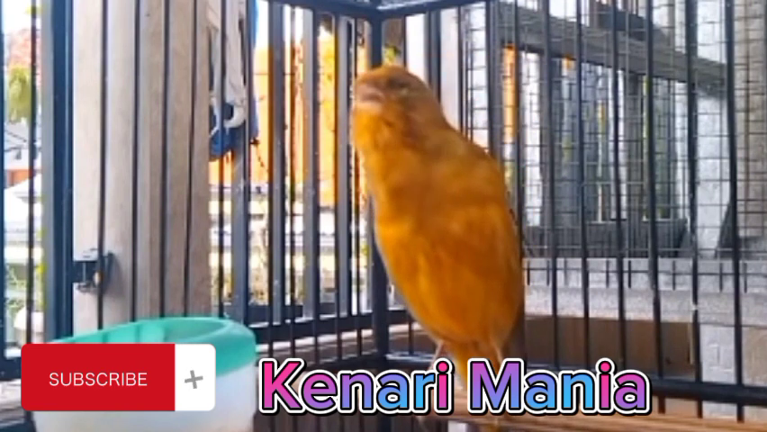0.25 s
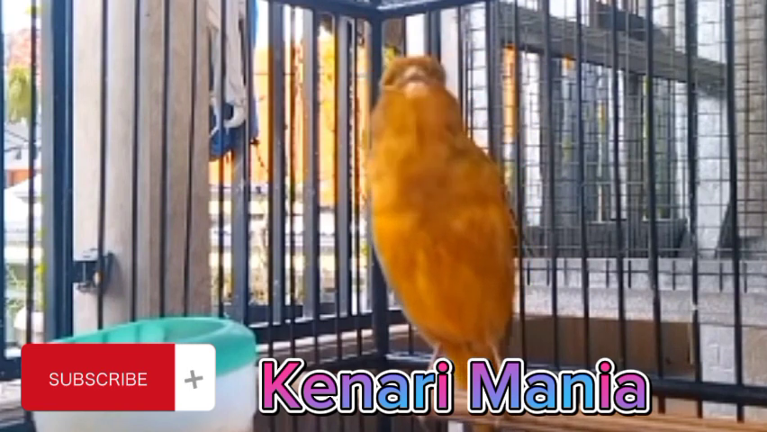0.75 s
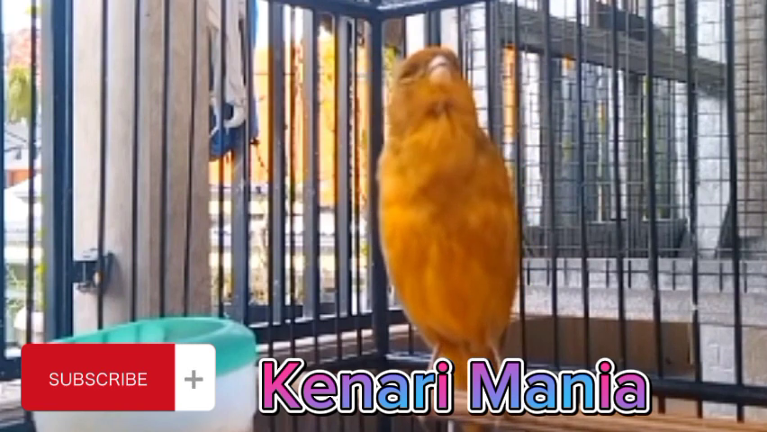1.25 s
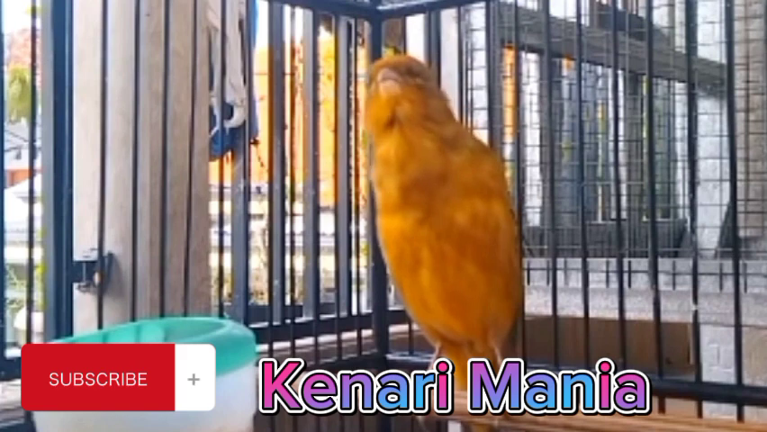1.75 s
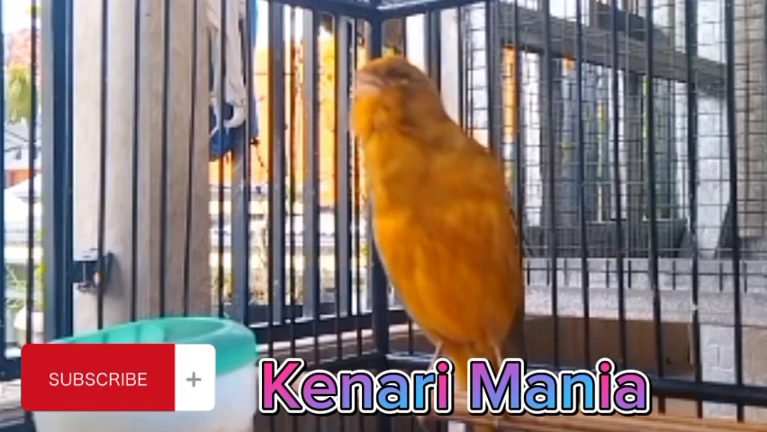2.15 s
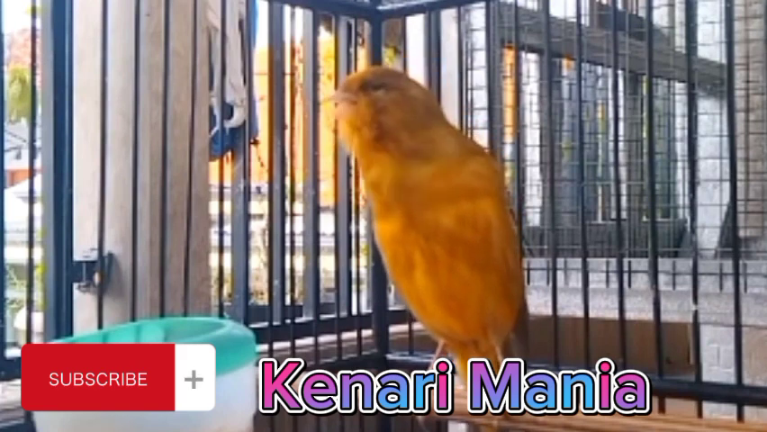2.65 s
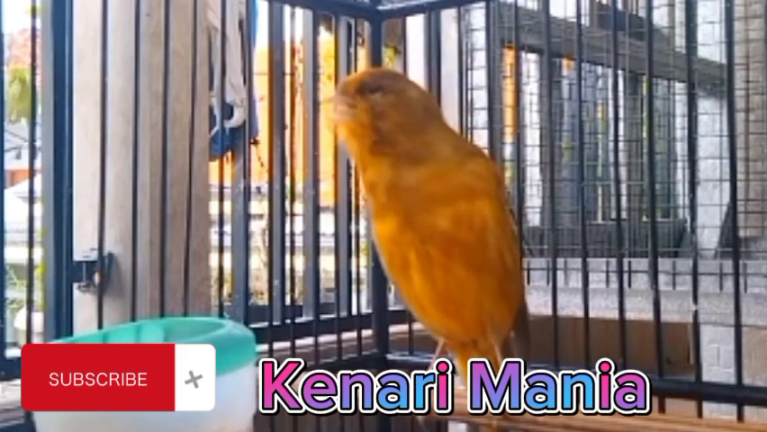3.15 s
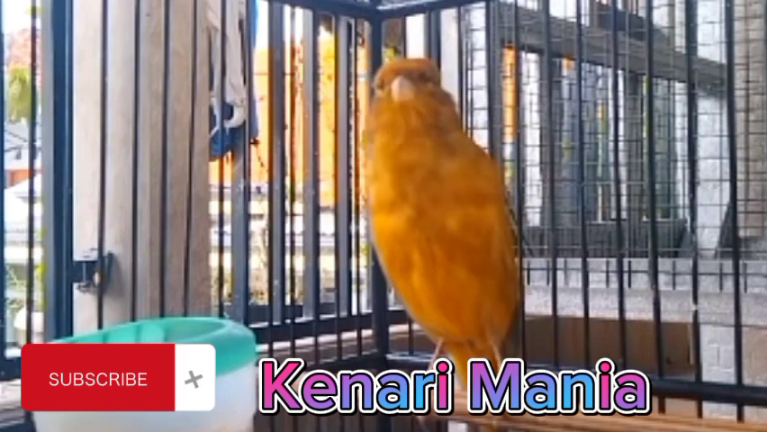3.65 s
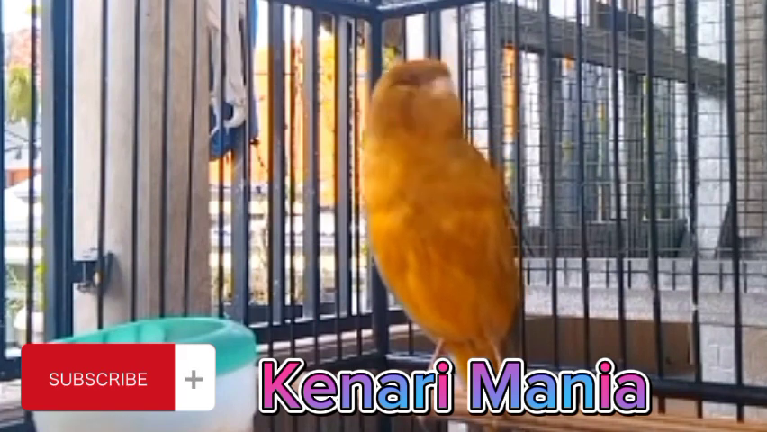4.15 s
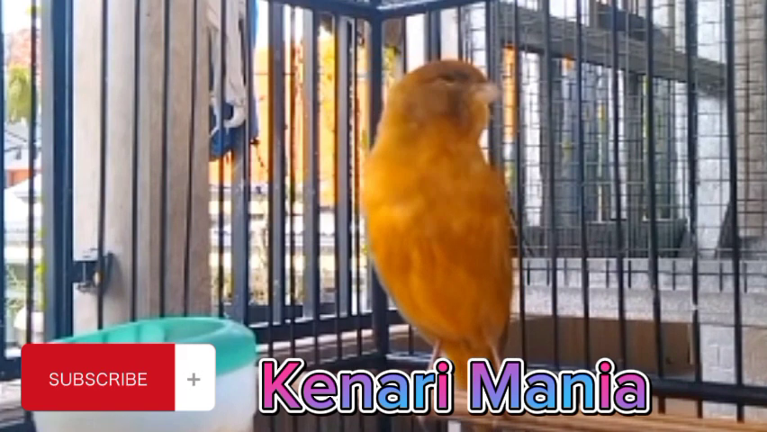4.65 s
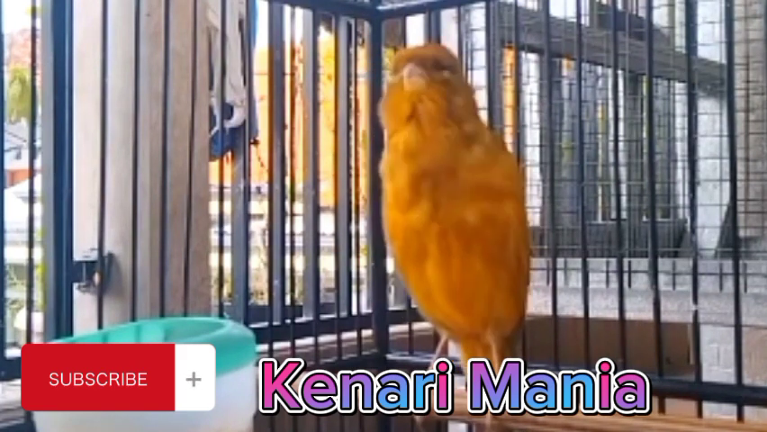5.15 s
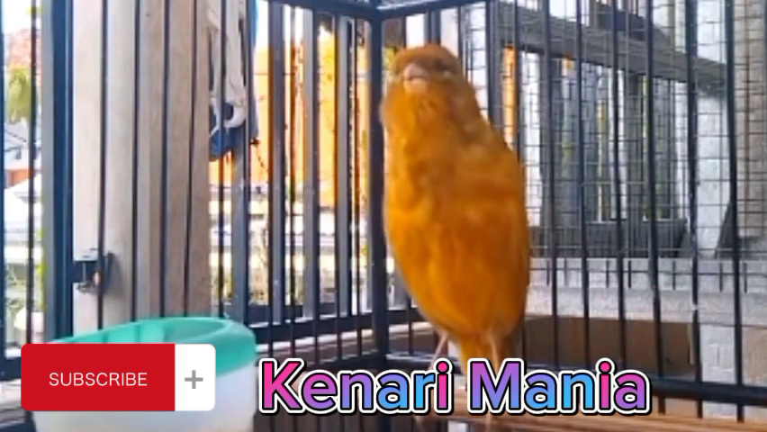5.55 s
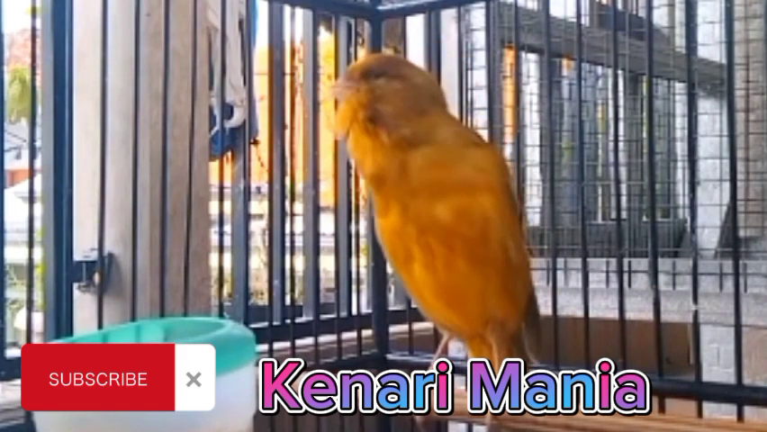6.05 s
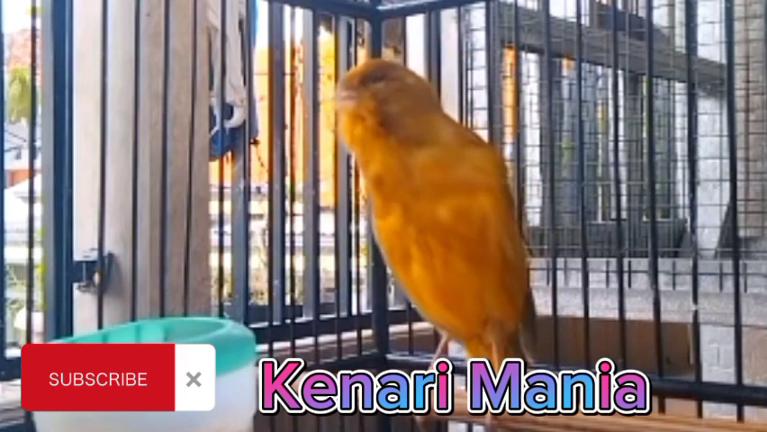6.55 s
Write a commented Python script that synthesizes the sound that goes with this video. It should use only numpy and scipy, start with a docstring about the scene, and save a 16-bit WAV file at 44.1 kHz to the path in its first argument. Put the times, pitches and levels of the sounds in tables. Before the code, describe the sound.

Over a faint hiss of distant traffic, a canary whistles loudly at close range, its notes ringing briefly off nearby walls. Downward swoops lead to rising notes, a rapid chirping trill and five falling whistles. The bird then rests while a soft low drone swells behind. After a brief dropout, the song returns with two tiny ticks and another series of high, falling whistles.

```python
"""A caged canary sings close by: falling and rising whistles, a fast trill, more falling whistles.
Each note is a gliding sine with weak overtones and a rasp of air in the beak; nearby walls answer it
with echoes and a diffuse tail. Distant street noise and a low, swelling drone lie behind.
The microphone flattens the loudest peaks. The sound drops out once for a moment and ticks twice
in the whistle after it."""
import sys
import numpy as np
from scipy import signal
from scipy.fft import rfft, irfft, next_fast_len
from scipy.io import wavfile
from scipy.ndimage import uniform_filter1d, map_coordinates

SR = 44100
rng = np.random.default_rng(int(sys.argv[2]) if len(sys.argv) > 2 else 0)


def bounce(signal):
    """Save signal as a 16-bit WAV file at the path given by the first command-line argument."""
    frames = np.transpose(np.atleast_2d(signal))
    limited = np.clip(frames, -1, 1)
    pcm = np.round(limited * 32767).astype(np.int16)
    wavfile.write(sys.argv[1], SR, pcm)


N = 300321
TIME = np.arange(N) / SR


def amp(db):
    """Gain of a level in dB."""
    return 10 ** (np.asarray(db) / 20)


def unit_rms(x):
    """x scaled to rms 1."""
    return x / np.sqrt(np.mean(x ** 2) + 1e-20)


def at_hz(points, hz):
    """(Hz, value) points interpolated on a log frequency axis."""
    knots_hz, values = np.transpose(points)
    return np.interp(np.log(hz + 1), np.log(knots_hz + 1), values)


def wobble(rate_hz, count=N):
    """Smooth random curve, rate_hz knots a second."""
    knots = rng.standard_normal(int(count * rate_hz / SR) + 4)
    return map_coordinates(knots, [np.arange(count) * rate_hz / SR])


def filtered(x, response):
    """x filtered by response, a gain as a function of Hz."""
    size = next_fast_len(N + SR // 2)
    return irfft(rfft(x, size) * response(np.fft.rfftfreq(size, 1 / SR)), size)[..., :N]


# Each row: frequency in Hz, relative spectral density in dB.
STREET_SPECTRUM = [(18, -45), (30, -11), (245, -8.5), (384, -7.5), (740, -2), (844, -1), (1010, -3),
                   (1720, -6), (1960, -9), (2680, -2), (3670, -7.5), (7270, -18), (9220, -33),
                   (14800, -46.5), (16000, -43)]
# Each row: time in seconds, level in dB.
STREET_ENVELOPE = [(0, -47), (2.2, -47), (4.5, -48.5), (5.4, -49), (6.81, -48)]


def street():
    """Far traffic and air: a broad hiss that wavers gently in colour and level."""
    spectra = signal.stft(rng.standard_normal(N), nperseg=512)[2]
    patches = uniform_filter1d(rng.standard_normal(spectra.shape), 8, axis=0)
    patches = uniform_filter1d(patches, 10, axis=1)
    noise = signal.istft(spectra * amp(1.4 * unit_rms(patches)), nperseg=512)[1][:N]
    hiss = unit_rms(filtered(noise, lambda hz: amp(at_hz(STREET_SPECTRUM, hz))))
    level_db = np.interp(TIME, *np.transpose(STREET_ENVELOPE)) + 0.32 * wobble(3.0) + 0.2 * wobble(14)
    return amp(level_db) * hiss


# Each row: centre in Hz, width in Hz, relative gain per pass in dB.
DRONE_RESONANCES = [(136, 61, -2.5), (215, 81, -3)]
# Each row: time in seconds, level in dB.
DRONE_ENVELOPE = [(3.4, -65), (3.95, -62), (4.15, -59.5), (4.35, -54), (4.43, -63), (4.54, -60), (4.6, -66),
                  (5.5, -71), (5.63, -56.5), (5.75, -61.5), (5.95, -68.5), (6.5, -69), (6.81, -61)]


def drone():
    """A low, swelling hum: noise passed twice through a pair of resonances."""
    def resonances(hz):
        return sum(amp(db) * 1j * hz * width / (centre ** 2 - hz ** 2 + 1j * hz * width)
                   for centre, width, db in DRONE_RESONANCES)

    hum = unit_rms(filtered(rng.standard_normal(N), lambda hz: resonances(hz) ** 2))
    return amp(np.interp(TIME, *np.transpose(DRONE_ENVELOPE), left=-120, right=-120)) * hum


# Each row: frequency in Hz, time to decay 60 dB in seconds.
TAIL_T60 = [(2000, 0.35), (3000, 0.39), (4000, 0.41), (5500, 0.32), (8000, 0.13), (13000, 0.35)]
# Each row: frequency in Hz, relative level in dB.
TAIL_COLOUR = [(2200, 5.5), (2700, 0.5), (3300, -6.5), (4000, 0), (5000, 0), (6500, -1.5), (9000, 4.5),
               (14000, 2.5)]
# Each row: delay in ms, gain in dB.
WALL_ECHOES = [(2.5, -9.5), (8.2, -11), (12.7, -9.5), (28, -19.5), (55, -19), (85, -32)]


def walls(tail_db, scatter):
    """Room impulse response: a diffuse tail, and echoes that bars and rough walls smear with distance."""
    hz, t, spectra = signal.stft(rng.standard_normal(SR // 2), SR, nperseg=256)
    decay_db = at_hz(TAIL_COLOUR, hz)[:, None] - 60 * t / at_hz(TAIL_T60, hz)[:, None]
    tail = signal.istft(spectra * amp(decay_db), SR, nperseg=256)[1]
    ms = np.arange(len(tail)) * 1000 / SR
    tail *= 1 - np.exp(-ms / 9)
    response = amp(tail_db) * tail / np.linalg.norm(tail)
    for delay_ms, db in WALL_ECHOES:
        burst = np.exp(-((ms - delay_ms) / (scatter * delay_ms)) ** 2) * rng.standard_normal(len(ms))
        response += amp(db) * burst / np.linalg.norm(burst)
    return response


# Each row: start in seconds, length in seconds, top in Hz, bottom in Hz, gain in dB.
SWOOP_NOTES = [(-.218, 0.15, 6670, 2735, 2), (0, 0.15, 6810, 2740, 0), (.219, 0.15, 6780, 2652, -0.5)]
# Each row: share of the length, share of the drop still to come.
SWOOP_GLIDE = [(0, 0.99), (.13, .94), (.38, .69), (.6, .47), (.69, .46), (.84, .27), (.92, .12), (1, 0.035)]
# Each row: pitch in Hz, level in dB.
SWOOP_LEVEL_BY_PITCH = [(2740, -12), (2950, -12), (3150, -11.5), (3420, -23), (3750, -5.5), (4300, -13.5),
                        (4550, -10.5), (4750, -23), (5050, -15), (5400, -23.5), (6000, -25.5), (6700, -44)]


def swoop(start_s, length_s, top_hz, bottom_hz, db):
    """Contour of a loud, steep drop that lingers where the voice changes register."""
    progress = np.linspace(0, 1, 80)
    hz = bottom_hz + (top_hz - bottom_hz) * np.interp(progress, *np.transpose(SWOOP_GLIDE))
    return np.transpose([start_s + progress * length_s, hz, db + at_hz(SWOOP_LEVEL_BY_PITCH, hz)])


# Each row: start, length and glide time in seconds, top and bottom in Hz, gain in dB,
# tilt in dB per octave, gain around HIGH_HZ in dB.
FALL_NOTES = [(2.481, 0.19, 0.18, 6930, 2546, 0.5, 3.2, -21), (2.704, 0.19, 0.19, 7220, 2540, 0.8, 0, 1.5),
              (2.934, 0.2, 0.19, 7160, 2551, 2, -4, 3.5), (3.171, 0.23, 0.2, 7010, 2477, 0, 1.8, -2),
              (3.44, 0.19, 0.2, 7150, 2495, 0, 0.3, 1), (5.51, 0.19, 0.2, 6730, 2673, 0.5, 3, -5),
              (5.733, 0.2, 0.19, 7010, 2680, 1.4, 0.2, -3.5), (5.965, 0.2, 0.18, 6940, 2647, -0.4, 3.7, 1),
              (6.182, .2, 0.2, 7010, 2614, -1, -1, -0.5), (6.437, .24, 0.21, 6920, 2533, -1.5, -0.3, 5),
              (6.725, .2, .21, 7020, 2490, -1, 1.5, 4.5)]
# Each row: pitch in Hz, level in dB before the bird turns, level in dB after.
FALL_LEVEL_BY_PITCH = [(2579, -21, -21.5), (2665, -26, -30), (2750, -23, -23), (3060, -20, -18.5),
                       (3320, -18.5, -23), (3640, -26, -21), (3990, -23.5, -25), (4290, -31, -29.5),
                       (4770, -33, -27.5), (5230, -38, -33.5), (5820, -28.5, -32), (6980, -43, -50)]
TURN_S = 4.5
REGISTER_HZ, REGISTER_WIDTH_HZ, REGISTER_PULL = 4700, 450, 0.33
HIGH_HZ, HIGH_WIDTH_HZ = 6050, 480
RELEASE_S, RELEASE_DB = 0.017, 8
FLUTTER_DB, FLUTTER_HZ = 1.75, 110.1


def fall(start_s, length_s, glide_s, top_hz, bottom_hz, db, tilt_db, high_db):
    """Contour of a slow, fluttering fall: a near parabola that lingers at the register change."""
    t = np.linspace(0, length_s, 80)
    hz = bottom_hz + (top_hz - bottom_hz) * np.clip(1 - t / glide_s, 0, 1) ** 2.04
    hz -= REGISTER_PULL * (hz - REGISTER_HZ) * np.exp(-((hz - REGISTER_HZ) / REGISTER_WIDTH_HZ) ** 2)
    pitch_hz, before_db, after_db = np.transpose(FALL_LEVEL_BY_PITCH)
    level_db = db + at_hz(np.transpose([pitch_hz, before_db if start_s < TURN_S else after_db]), hz)
    level_db += tilt_db * np.log2(hz / 3500)
    level_db += high_db * np.exp(-((hz - HIGH_HZ) / HIGH_WIDTH_HZ) ** 2)
    level_db -= RELEASE_DB * np.clip(1 - (length_s - t) / RELEASE_S, 0, 1)
    level_db += FLUTTER_DB * map_coordinates(rng.standard_normal(64), [t * FLUTTER_HZ])
    return np.transpose([start_s + t, hz, level_db])


# Each row: start and length in seconds, level, accent and swell in dB, swell length in seconds.
RISE_NOTES = [(.64, 0.15, -20, 12, 2.5, 0.026), (.812, .146, -19.5, 11.5, 5.5, 0.024),
              (0.984, .149, -19.5, 10.5, 5.5, 0.037), (1.16, 0.05, -17, 6, -4.5, 0.0084)]
# Each row: time into the note in seconds, pitch in Hz.
RISE_GLIDE = [(0, 2420), (.005, 2847), (.009, 3180), (.013, 3318), (.019, 3530), (.037, 4230), (.055, 4570),
              (.074, 4785), (.11, 4956), (.148, 5062)]
ATTACK_S, ATTACK_DB, SAG_DB = 0.0063, 23, 4
ACCENT_AT_S, ACCENT_WIDTH_S = 0.012, 0.0035


def rise(start_s, length_s, db, accent_db, swell_db, swell_s):
    """Contour of a rising whistle: quick attack, accent, slow sag, closing swell."""
    t = np.linspace(0, length_s, 120)
    attack_db = ATTACK_DB * np.clip(1 - t / ATTACK_S, 0, 1)
    accent = np.exp(-((t - ACCENT_AT_S) / ACCENT_WIDTH_S) ** 4)
    swell = np.clip((t - length_s + swell_s) / 0.004, 0, 1)
    level_db = db - attack_db + accent_db * accent - SAG_DB * t / length_s + swell_db * swell
    return np.transpose([start_s + t, np.interp(t, *np.transpose(RISE_GLIDE)), level_db])


# Each row: start in seconds, level in dB.
FLICK_NOTES = [(2.476, -40), (2.7, -29), (2.93, -38.5), (3.167, -40)]


def flick(start_s, db, length_s=0.004, from_hz=5100, to_hz=7040, fade_db=1.5):
    """Contour of the upward flick that leads into a fall."""
    return [(start_s, from_hz, db), (start_s + length_s, to_hz, db - fade_db)]


# Each row: time in seconds, base level in dB, base pitch in Hz.
TRILL_NOTES = [(1.2569, -5.5, 3943), (1.314, -4, 3885), (1.3694, -4.5, 3907), (1.4278, -3, 3890),
               (1.4838, -3, 3896), (1.542, -3.5, 3840), (1.5996, -3.5, 3864), (1.6582, -4, 3850),
               (1.716, -3.5, 3858), (1.775, -3.5, 3843), (1.8344, -4.5, 3813), (1.894, -4, 3823),
               (1.954, -6, 3830), (2.0138, -5, 3850), (2.0742, -3.5, 3850), (2.134, -6, 3865),
               (2.1946, -7, 3765), (2.2598, -9, 3880)]
# Each row: time offset in seconds, ratio to base pitch, level offset in dB.
CHIRP_SHAPE = [(-.022, 0.51, -43), (-.015, 0.72, -24.5), (-.008, .84, -20), (-.002, .93, -12.5),
               (.002, 0.9675, -2), (.005, 1.04, -3.5), (.008, 1.091, -13.5), (0.012, 1.055, -11.5)]


def trill():
    """Contours of a fast run of upward chirps, all of one shape."""
    return [[(s + lag_s, hz * ratio, db + offset_db) for lag_s, ratio, offset_db in CHIRP_SHAPE]
            for s, db, hz in TRILL_NOTES]


# Where the beak points. Each row: time in seconds, overtone gain in dB, room gain in dB.
BEAK_AIM = [(0, 0.5, -1.5), (.5, -0.5, -1), (.65, 1.5, -0.5), (1.15, -1.5, -1.5), (1.3, -3.5, -2.5),
            (2.25, -5, 0), (2.4, -1.5, -1.5), (2.6, -5, -0.1), (3.7, -5, -0.6), (5.4, -6, -2),
            (6.1, -5.5, -0.5), (6.81, -7, -0.8)]
# Each row: harmonic number, base level in dB relative to the fundamental, flutter rate in Hz.
HARMONICS = [(2, -44.5, 60), (3, -37.5, 120), (4, -55, 78), (5, -55.5, 90)]
# Each row: frequency in Hz, gain in dB.
HARMONIC_COLOUR = [(5000, 0), (7000, 4), (8300, -1), (9500, -5.5), (10500, -5.5), (11500, -8), (13000, 4),
                   (15000, 3.5)]
RASP_LOW_HZ, RASP_HIGH_HZ = 10900, 16000


def whistle(contour, edge_s=0.0023, quiver=0.0025, rough_rad=1.0, flutter_db=5.5, rasp_db=-49.5):
    """First sample and sound of a note: a gliding sine whose overtones and air rasp grow with effort."""
    s, hz, db = np.transpose(contour)
    first = int(s[0] * SR)
    t = np.arange(first, int((s[-1] + edge_s) * SR)) / SR
    pitch_hz = uniform_filter1d(np.interp(t, s, hz), size=SR // 300, mode="nearest")
    phase = 2 * np.pi * np.cumsum(pitch_hz * (1 + quiver * wobble(250, len(t)))) / SR
    level_db = np.interp(t, s, db)
    beak_db = np.interp(t, *np.transpose(BEAK_AIM)[:2])
    effort_db = 0.39 * (level_db + 19.5)
    bright_db = beak_db + effort_db
    tone = np.sin(phase)
    for k, base_db, flutter_hz in HARMONICS:
        harmonic_hz = k * pitch_hz
        colour_db = at_hz(HARMONIC_COLOUR, harmonic_hz) + flutter_db * wobble(flutter_hz, len(t))
        colour_db += 1.4 * beak_db * np.clip(np.log2(harmonic_hz / 8500), 0, 1)  # highs beam most
        harmonic = np.sin(k * phase + rough_rad * wobble(400, len(t)))
        tone += (harmonic_hz < SR / 2) * amp(base_db + bright_db + colour_db) * harmonic
    rasp_band = signal.butter(4, (RASP_LOW_HZ, RASP_HIGH_HZ), "bandpass", fs=SR, output="sos")
    tone += amp(rasp_db + bright_db) * signal.sosfilt(rasp_band, rng.standard_normal(len(t)))
    soft_ends = np.clip(np.minimum(t - t[0], t[-1] - t) / edge_s, 0, 1)
    return first, np.sqrt(2) * amp(level_db) * soft_ends * tone


# One contour per note linking the phrases. Each row: time in seconds, pitch in Hz, level in dB.
LINK_CONTOURS = [
    [(.432, 6750, -48), (.448, 6420, -49), (.461, 6040, -31), (.472, 6020, -27), (.485, 5550, -29),
     (.498, 5170, -21.5), (.511, 4900, -28.5), (.525, 4690, -18), (.538, 4320, -29)],
    [(.555, 4600, -32), (.575, 4780, -27), (.593, 4840, -21.5), (.61, 4896, -24), (.632, 4900, -29)],
    [(2.296, 2420, -24), (2.305, 3430, -42.5)],
    [(2.315, 5200, -33.5), (2.339, 4760, -18), (2.346, 4210, -29.5), (2.362, 3793, -11.5),
     (2.378, 3464, -13), (2.393, 3110, -15.5), (2.409, 2920, -12.5), (2.424, 2727, -18.5),
     (2.44, 2800, -20.5)],
    [(5.366, 5840, -36), (5.393, 4900, -36), (5.419, 3925, -19), (5.425, 3670, -10.5), (5.441, 3180, -32),
     (5.445, 3030, -7), (5.45, 2920, -18), (5.459, 2877, -13.5), (5.472, 2930, -20.5)],
]


def canary(direct_db=-0.5):
    """Every contour whistled, direct and off the walls, whose answer shifts as the head turns."""
    contours = [swoop(*row) for row in SWOOP_NOTES]
    contours += [fall(*row) for row in FALL_NOTES]
    contours += [rise(*row) for row in RISE_NOTES]
    contours += [flick(*row) for row in FLICK_NOTES]
    song = np.zeros(N + 2 * SR)  # starts 1 s early: only the first swoop's ring is heard
    for contour in contours + trill() + LINK_CONTOURS:
        first, tone = whistle(contour)
        room_db = np.interp(first / SR, *np.transpose(BEAK_AIM)[::2])
        echo = signal.fftconvolve(amp(room_db) * tone, walls(tail_db=-8.0, scatter=0.28))
        song[SR + first:][:len(tone)] += amp(direct_db) * tone
        song[SR + first:][:len(echo)] += echo
    return song[SR:SR + N]


def scene():
    """Bird, street and drone in mono."""
    return (canary() + street() + drone())[None]


# Each row: frequency in Hz, gain in dB.
MIC_RESPONSE = [(20, -25.5), (90, 2), (7000, -0.5), (8500, 1.5), (9800, -7.5), (11300, 0.5), (13000, -3.5),
                (15000, 4.5)]
# Each row: time in seconds, sharp edge level in dB, soft body level in dB.
TICK_EVENTS = [(5.4224, -16, -21), (5.4438, -21, -30)]
PEAK_LIMIT, TICK_T60_S, TOP_HZ = 0.67, 0.0003, 15850
DROPOUT_S, RETURN_S, FADE_IN_S = 5.1297, 5.2675, 0.015


def record(dry):
    """A microphone that flattens the loudest peaks, then two ticks, a dropout and a band limit."""
    limited = dry / (1 + abs(dry / PEAK_LIMIT) ** 12) ** (1 / 12)
    sound = filtered(limited, lambda hz: amp(at_hz(MIC_RESPONSE, hz)))
    for s, edge_db, body_db in TICK_EVENTS:
        first = round(s * SR)
        sound[:, first] += amp(edge_db)
        sound[:, first:first + 40] += amp(body_db - 60 * TIME[:40] / TICK_T60_S)
    gate = np.where(TIME < DROPOUT_S, 1, np.clip((TIME - RETURN_S) / FADE_IN_S, 0, 1))
    return filtered(sound * gate, lambda hz: np.clip((TOP_HZ + 100 - hz) / 200, 0, 1))


dry = scene()
out = record(dry)
bounce(out)
```